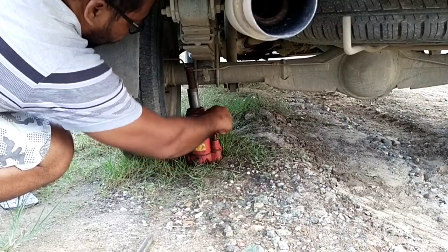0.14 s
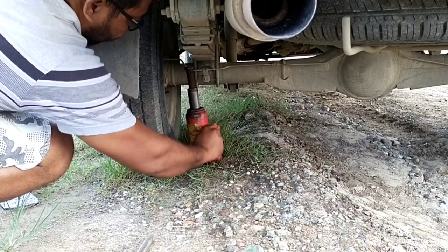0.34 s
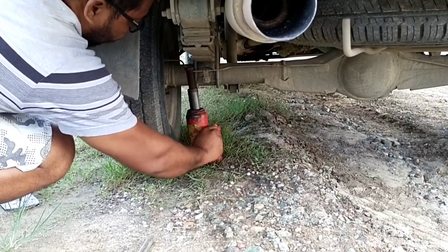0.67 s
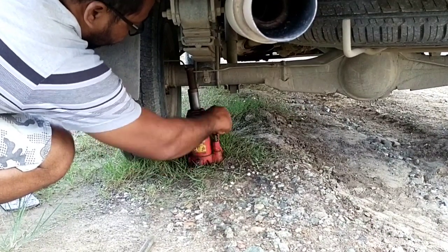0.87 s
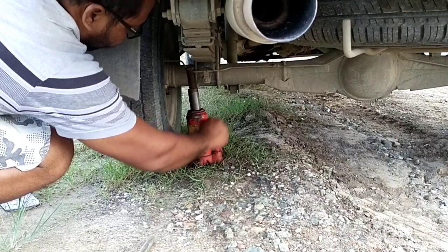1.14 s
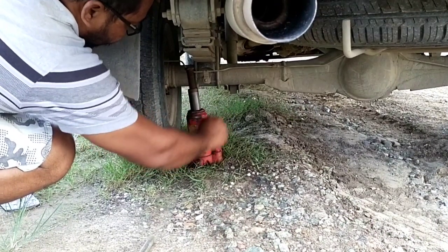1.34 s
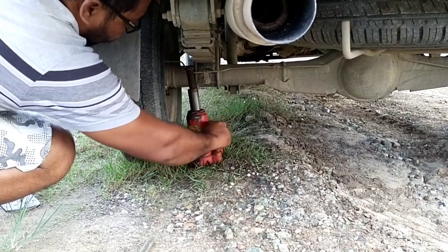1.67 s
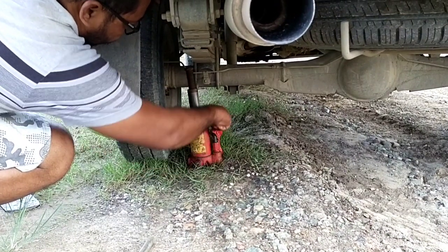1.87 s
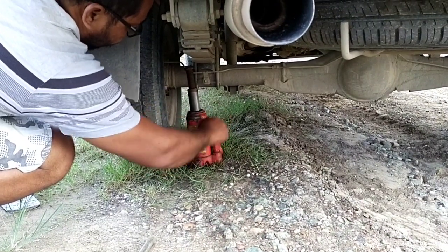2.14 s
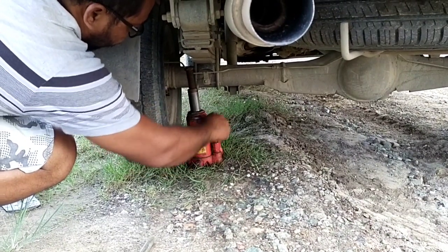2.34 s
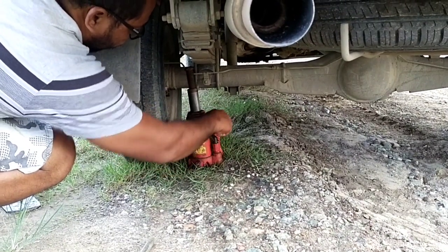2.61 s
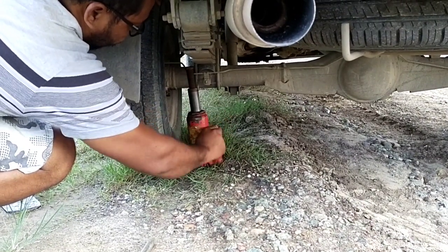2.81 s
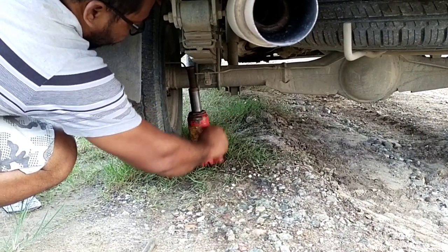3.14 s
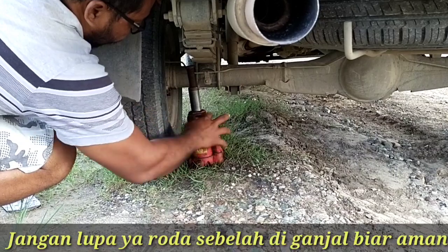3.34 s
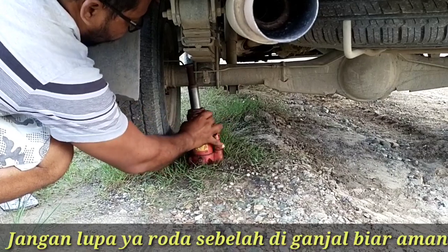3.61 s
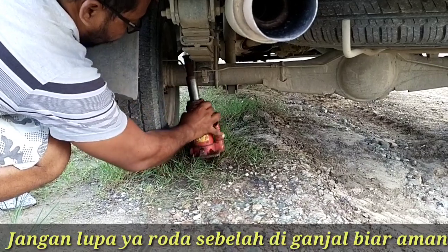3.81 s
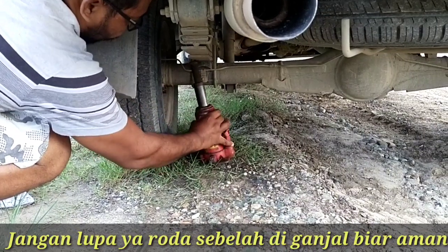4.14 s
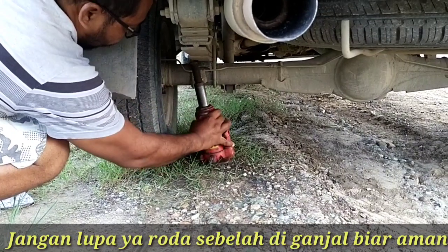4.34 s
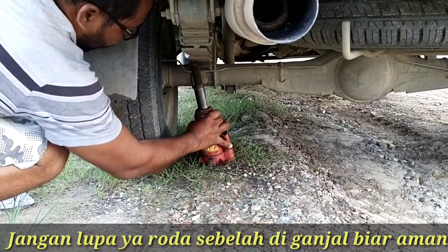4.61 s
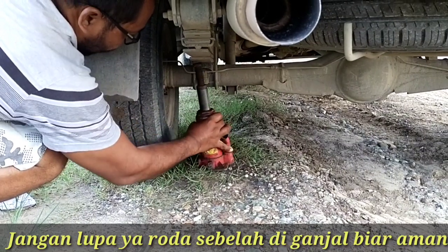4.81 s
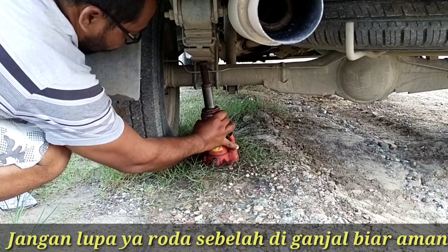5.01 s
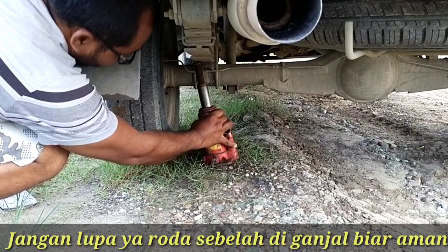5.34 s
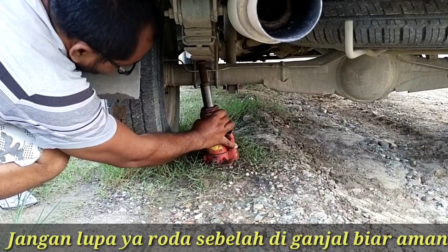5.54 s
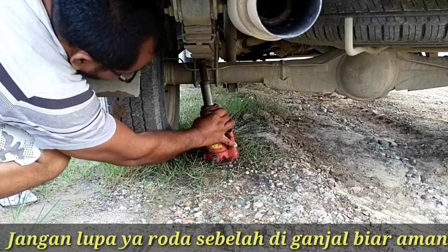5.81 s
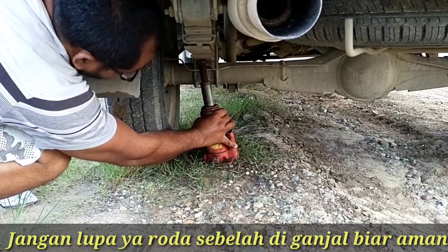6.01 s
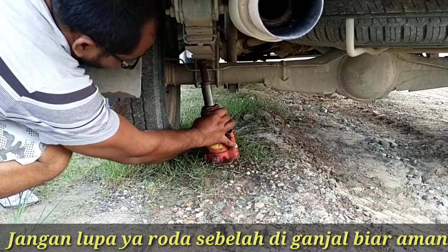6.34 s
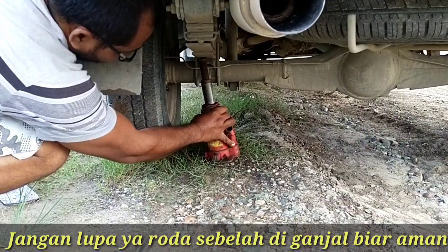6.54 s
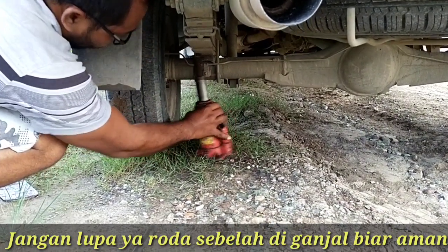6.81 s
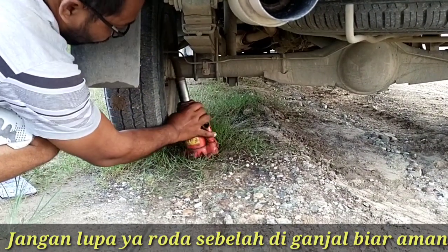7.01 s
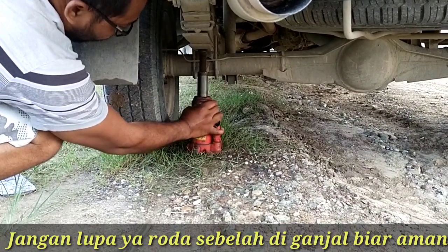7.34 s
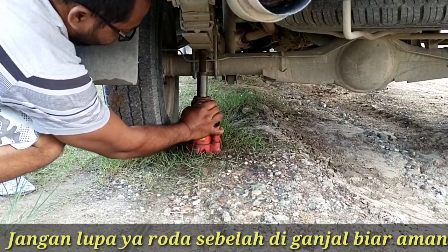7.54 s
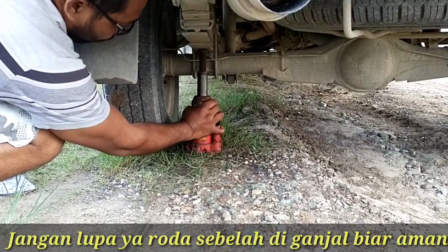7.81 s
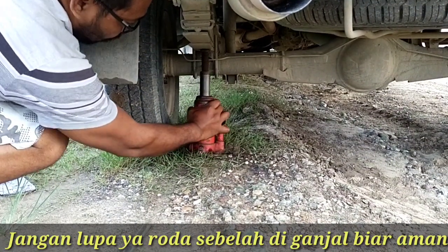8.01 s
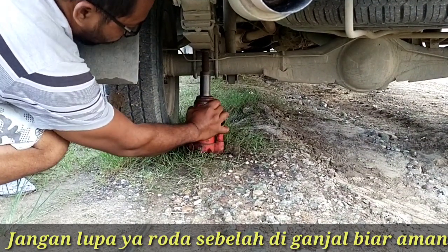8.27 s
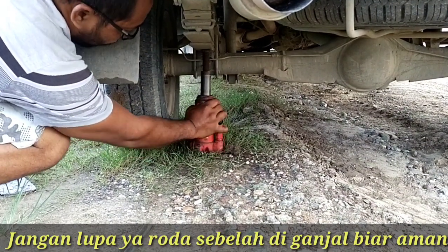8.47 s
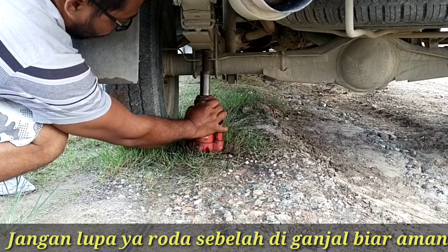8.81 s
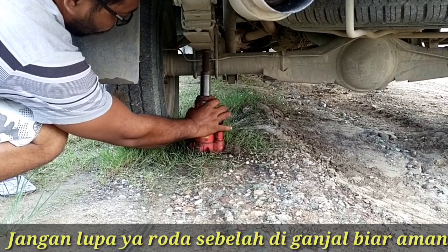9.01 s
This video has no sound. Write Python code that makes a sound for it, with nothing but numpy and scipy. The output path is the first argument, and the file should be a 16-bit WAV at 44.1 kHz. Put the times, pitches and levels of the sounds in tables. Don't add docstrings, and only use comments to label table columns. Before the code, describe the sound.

A hand-pumped steel jack clacks and rattles quickly, then shifts with ringing knocks and gravel scrapes, while a motorbike thumps low in the distance.

```python
import sys
import numpy as np
from scipy import signal
from scipy.fft import rfft, irfft, next_fast_len
from scipy.io import wavfile
from scipy.ndimage import uniform_filter1d, map_coordinates

SR = 44100
rng = np.random.default_rng(int(sys.argv[2]) if len(sys.argv) > 2 else 0)


def output_pcm(signal):
    pcm = np.clip(np.atleast_2d(signal).T, -1, 1) * 32767
    wavfile.write(sys.argv[1], SR, np.round(pcm).astype(np.int16))


def invert_db(x):
    u = np.asarray(x, float) / 20
    return 10 ** u


N = 403515

# (frequency [Hz], width [Hz], level [dB])
LINK_MODES = [(1170, 120, -9), (2410, 150, 3), (2760, 90, -6), (3330, 49, -5.5), (4020, 54, -10),
              (5400, 120, -8), (6030, 200, -4), (6626, 44, -6.5), (7800, 200, -13), (9240, 48, -11.5),
              (10870, 40, -9), (12150, 28, -13.5), (12860, 29, -15), (13400, 51, -19.5)]
# (frequency [Hz], width [Hz], level [dB])
AXLE_MODES = [(114.4, 28.7, 2), (245, 41, 6.5), (366, 64, -3), (587, 57, 2), (856, 27, -3.5), (989, 38, -2),
              (1161, 54, -7.5), (1300, 80, -3), (1475, 110, -8.5), (1664, 74, -4.5), (2053, 16, -15.5),
              (2810, 52, -3.5), (3070, 13, -10.5), (3965, 53, -7), (4430, 140, -18), (5890, 49, -17.5),
              (8500, 430, -26)]
# (time [s], level [dB], throttle bark over the thump [dB])
BIKE_LEVELS = [(0, -46, -22.5), (.8, -45, -44), (1.45, -49, -25.5), (1.75, -55.5, -29.5), (2.1, -67, -20),
               (2.75, -74.5, -20), (3.12, -57.5, -21), (3.32, -67.5, -28), (3.85, -49, -7), (4.02, -63, -3),
               (4.2, -49, -7.5), (4.72, -43.5, -8.5), (4.92, -57, -4), (5.3, -46.5, -12.5),
               (6.0, -38.5, -14), (6.8, -35.5, -18.5), (7.2, -37, -12.5), (9.15, -36, -6.5)]


def unit(x):
    return x / np.sqrt(np.mean(x ** 2) + 1e-20)


def along(points, hz):
    f, v = np.transpose(points)
    return np.interp(np.log(hz + 1), np.log(f + 1), v)


def curves(rows):
    s, *cols = np.transpose(rows)
    return [np.interp(np.arange(N) / SR, s, c) for c in cols]


def strokes(rows, sharp):
    t, gain = np.arange(N) / SR, np.zeros(N)
    for start, top, end, db in rows:
        phase = np.interp(t, [start, top, end], [0, np.pi / 2, np.pi])
        gain += invert_db(db) * np.sin(phase) ** sharp * (t < end)
    return gain


def wobble(rate_hz):
    at = np.arange(0, N + 32, 32)
    knots = rng.standard_normal(int(N * rate_hz / SR) + 4)
    return np.interp(np.arange(N), at, map_coordinates(knots, [at * rate_hz / SR]))


def filtered(x, response):
    m = next_fast_len(N + SR // 2)
    return irfft(rfft(x, m) * response(np.fft.rfftfreq(m, 1 / SR)), m)[..., :N]


def peak(f, hz, width_hz):
    return 1j * f * width_hz / (hz * hz - f * f + 1j * f * width_hz)


def body(modes, broad_db, lo_hz=0, hi_hz=102400.0, gain_db=0):
    def response(bins):
        f = bins[::8]
        edges = 1 / np.sqrt((1 + (lo_hz / (f + 1)) ** 6) * (1 + (f / hi_hz) ** 6))
        skirt = invert_db(broad_db + along([(hz, db) for hz, _, db in modes], f))
        ringing = sum((-1) ** k * invert_db(db) * peak(f, hz, w) for k, (hz, w, db) in enumerate(modes))
        h = edges * (skirt + ringing)
        return np.interp(bins, f, invert_db(gain_db) * h / np.sqrt(np.mean(np.abs(h) ** 2)))
    return response


def gritty(per_s, spread_db):
    hits = rng.random(N) < per_s / SR
    return unit(hits * rng.standard_normal(N) * invert_db(spread_db * rng.exponential(1, N)))


def blows(events, bands, snap, tail_db, tail_stretch, spot=.5, strike=0, cancel=0):
    t, out = np.arange(SR // 3) / SR, np.zeros(N)
    for k, (response, t60_factor, rise_s) in enumerate(bands):
        push = np.zeros(N + SR)
        grain = rng.standard_normal(N + SR) * np.resize(invert_db(2.24 * wobble(400)), N + SR)
        impulse = strike * np.exp(-rise_s / 0.0026)
        for s, db, *more in events:
            level = invert_db(db + ([0] + more[:-1])[k])
            t60_s = more[len(bands) - 1] * t60_factor
            at, hit = round(s * SR), round((s + rise_s) * SR)
            fade = invert_db(-60 * t / t60_s) + snap * invert_db(-60 * t / 0.0051)
            fade += invert_db(tail_db - 60 * t / (t60_s * tail_stretch))
            burst = grain[at:][:len(t)]
            if k == 0 and len(more) > len(bands):
                burst = unit(signal.lfilter(*signal.iirpeak(more[-1], 1 / spot, SR), burst))
            lag = 3 + int(abs(burst[0]) * 40) % 17
            burst = burst + cancel * np.roll(burst, lag)
            push[at:][:len(t)] += level * fade * (1 - np.exp(-t / rise_s)) * burst
            push[hit] += level * impulse
            push[hit + lag] += level * cancel * impulse
        out += filtered(push[:N], response)
    return out


def linkage():
    # (time [s], peak [dB], clang [dB], sizzle [dB])
    lifts = [(0.0265, -39, -6, -3.5), (0.0719, -33, -11, -11.5), (.382, -36.5, -12, -0.5),
             (0.4095, -30.5, -13, -7), (0.4289, -33, -15, -3), (0.7548, -39, -1.5, 11), (1.09, -46, -11, 0),
             (1.1151, -32, -5, -1), (1.1447, -31, -11, -18.5), (1.513, -44, -4.5, 2),
             (1.728, -40, -23.5, -14), (2.1106, -40.5, -13, -8), (2.504, -43.5, -2, 6),
             (2.537, -37, -17, 2), (2.868, -39, -33, -8.5), (2.8892, -33.5, 0, 12),
             (2.9198, -29, -21, -12.5)]
    # (time [s], peak [dB], sizzle [dB])
    stops = [
        (0.0893, -13, -9),
        (0.4438, -18.5, -19.5),
        (0.7888, -29.5, -6.5),
        (1.1612, -9.5, 1),
        (1.572, -38.5, -14),
        (1.805, -17, -14),
        (2.1976, -17.5, -9.5),
        (2.587, -19, -32),
        (2.9372, -13.5, -5),
    ]
    # (time [s], peak [dB], clang [dB], sizzle [dB])
    rattles = [(.142, -33, -3, -1.5), (.192, -25, -26, -2), (0.236, -46, -3, 0), (0.5012, -38.5, -10, 2),
               (0.5594, -36, -17, 2.5), (.585, -45.5, -19, 3.5), (0.846, -25, -9, -20),
               (.931, -33, -20, -4), (1.2532, -44.5, -3.5, -0.5), (1.305, -52, -10, 2.5),
               (1.861, -36, -11, 5.5), (1.9452, -40, -35, 2), (2.2465, -41, -4, 0),
               (2.277, -49.5, -17, -15), (2.3314, -41, -30, -28), (2.352, -55, -20, -24),
               (2.3845, -46, -31, -35), (2.437, -57, -14, -30), (2.6296, -39.5, -8, 0),
               (2.7271, -34, -27, -14), (3.009, -44.5, 2, -1), (3.072, -52.5, -15, -5),
               (3.338, -49, -1.5, -8)]
    # (time [s], peak [dB], clang [dB], sizzle [dB])
    jangles = [(3.686, -43.5, -19, 11.5), (3.7242, -23.5, -4, -8), (3.747, -29, 1, 9),
               (3.7667, -27.5, -21, -10.5), (4.558, -56.5, -25, 7.5), (5, -58, -15, 1),
               (6.5699, -57.5, -11, 11), (6.6487, -39, -1.5, 8), (7.7875, -47.5, -16.5, -1),
               (8.2003, -55, 6, -8), (8.2995, -46, -8, -12), (7.755, -56, -20, -6), (4.573, -59.5, -12, 9),
               (8.5146, -56, -24, -5.5)]
    loose_t60_s, halves_db, longest_s = 0.053, 10.5, 0.093
    stop_clang_db, stop_t60_s, jangle_t60_s = -11.5, 0.044, 0.064
    contacts = [(*row, jangle_t60_s) for row in jangles]
    for row in lifts + rattles:
        contacts.append((*row, min(longest_s, loose_t60_s * 2 ** (-(row[1] + 32) / halves_db))))
    for s, db, sizzle_db in stops:
        contacts.append((s, db, stop_clang_db, sizzle_db, stop_t60_s))
    skirt_db = -7
    bands = [(body(LINK_MODES, skirt_db, 1800, 4300), 1.01, .001),
             (body(LINK_MODES, skirt_db, 900, 1800), 1.1, .001),
             (body(LINK_MODES, skirt_db, 4500), .8, .0006)]
    return invert_db(-9) * blows(contacts, bands, snap=3.2, tail_db=-22.5, tail_stretch=5, strike=9, cancel=.35)


def plunger():
    # (start [s], end [s], level [dB])
    slides = [
        (0.013, 0.291, -51),
        (0.362, 0.58, -52.5),
        (0.712, 0.97, -54),
        (1.079, 1.316, -53),
        (1.695, 1.999, -57),
        (2.087, 2.303, -56),
        (2.49, 2.73, -66.5),
        (2.857, 3.028, -53.5),
    ]
    top = 0.35
    swells = [(start, start + top * (end - start), end, db) for start, end, db in slides]
    grains = gritty(1500, spread_db=3) * invert_db(5 * wobble(45))
    return strokes(swells, sharp=0.79) * unit(filtered(grains, body(LINK_MODES, -11, 1000, 12000)))


def base_rocking():
    # (time [s], peak [dB], t60 [s])
    rocks = [
        (0.251, -51, 0.093),
        (1.709, -52.5, 0.18),
        (1.974, -43, 0.026),
        (2.117, -45, 0.057),
        (2.374, -43, 0.079),
        (2.52, -45, 0.1),
        (2.726, -39, 0.025),
    ]
    bands = [(body(AXLE_MODES, -4, 210, 940), 1.01, .0031)]
    return invert_db(-6.5) * blows(rocks, bands, snap=1.0, tail_db=-14.5, tail_stretch=3.5)


def release_key():
    # (time [s], peak [dB])
    ticks = [
        (5.288, -44.5),
        (5.3005, -40.5),
    ]
    bands = [(lambda f: 3 * peak(f, 3100, 1100) ** 2, 1.01, .0007)]
    return blows([(*row, .03) for row in ticks], bands, snap=1.29, tail_db=-24.0, tail_stretch=3.4)


def axle_knocks():
    # (time [s], peak [dB], thud [dB], crack [dB], t60 [s])
    hits = [(3.453, -43.5, -1, -4, 0.22), (3.481, -45.5, 2, -9, 0.091), (3.511, -59.5, 3, -6, 0.1),
            (3.710, -40.5, 7.5, 5, 0.33), (3.789, -46, 6.5, -7, 0.087), (4.112, -31, -4, -10, 0.25),
            (4.486, -53, 10, -22, 0.12), (4.639, -24.5, -8, -12, 0.22), (4.44, -52, -6, -15, 0.095),
            (6.632, -40, -6, -16, 0.21), (6.902, -57, -9, -12, .3), (6.931, -11.5, -26.5, -10, 0.13),
            (6.947, -32, -2, -17, 0.34), (7.697, -38, 4.5, -3.5, 0.22), (8.226, -33, -14, -14, 0.19),
            (8.243, -35, 8, -6, .42)]
    ring_hz, octave_db = 836, 20.5
    events = [(*row, ring_hz * 2 ** (-row[2] / octave_db)) for row in hits]
    skirt_db = -9
    bands = [(body(AXLE_MODES, skirt_db, 500, 1900), 1.01, .0003),
             (body(AXLE_MODES, skirt_db, 180, 302, gain_db=17.5), 1.3, .009),
             (body(AXLE_MODES, skirt_db, 2000, 6000, gain_db=15), .3, .0005)]
    return invert_db(-19.0) * blows(events, bands, snap=2.1, tail_db=-27.5, tail_stretch=3.15, spot=0.48, strike=10.6)


def clear_rings():
    # (time [s], frequency [Hz], peak [dB], t60 [s])
    ringing = [(2.332, 2420, -46, .05), (2.352, 2400, -54, .05), (2.385, 2450, -48, .05),
               (2.439, 2400, -54, .06), (3.456, 378, -49.5, 0.26), (3.687, 6600, -44, .1),
               (3.722, 2850, -26, .09), (3.724, 609, -38, .15), (3.775, 490, -42, .25),
               (3.012, 1170, -56, .1), (3.747, 898, -33, .05), (3.767, 3290, -30, .05),
               (4.113, 1000, -40, .12), (4.113, 840, -46, .25), (4.113, 1430, -46, .1),
               (4.49, 620, -52, .05), (4.639, 1000, -40, .12), (4.639, 1430, -44, .1),
               (4.639, 3900, -46, .03), (4.65, 320, -44, .3), (5.301, 2847, -54, .1),
               (5.598, 900, -54, .03), (6.932, 600, -39.5, .2), (6.932, 2850, -42, .1),
               (6.932, 1650, -39, .08), (6.935, 1310, -40, .15), (6.947, 1425, -39.5, 0.21),
               (6.96, 400, -44, .5), (6.97, 1290, -56, .7), (7.7, 245, -38, .25), (7.7, 1676, -49, .06),
               (7.7, 2850, -58, .08), (8.228, 1340, -48, .15), (8.242, 2830, -52, .12),
               (8.25, 245, -29, .3), (8.3, 280, -40, .3), (8.26, 520, -50, .5), (8.298, 2230, -55, .1),
               (8.298, 3950, -56, .06), (8.45, 3900, -64, .03), (8.513, 3900, -60, .03),
               (9.088, 3750, -62, .02)]
    t, out = np.arange(SR // 2) / SR, np.zeros(N + SR)
    for s, hz, db, t60_s in ringing:
        swell = 1 - np.exp(-t * hz / 1.1)
        out[round(s * SR):][:len(t)] += invert_db(db - 60 * t / t60_s) * swell * np.sin(2 * np.pi * hz * t)
    return out[:N]


def scrape():
    # (start [s], loudest [s], end [s], level [dB])
    drags = [
        (3.705, 3.755, 3.8, -41),
        (4.27, 4.42, 4.57, -57.5),
        (4.62, 4.69, 4.8, -52),
        (6.5, 6.62, 6.76, -54.5),
        (7.62, 7.74, 7.9, -60),
        (8.22, 8.26, 8.33, -63),
        (5.3, 5.33, 5.42, -68),
        (6.08, 6.14, 6.23, -63.5),
    ]
    # (frequency [Hz], density [dB per Hz])
    grit = [(410, -58), (700, -8.5), (1200, -6.5), (1450, -4.5), (2160, -6), (3350, -4.5), (8870, -15.5),
            (15000, -34)]
    grains = gritty(6000, spread_db=-2.0) * invert_db(1.7 * wobble(50))
    return strokes(drags, sharp=1.67) * unit(filtered(grains, lambda f: invert_db(along(grit, f))))


def crunch():
    # (start [s], loudest [s], end [s], level [dB])
    crunches = [
        (3.705, 3.745, 3.84, -44),
        (4.3, 4.4, 4.5, -57),
        (4.64, 4.69, 4.78, -54),
        (6.5, 6.56, 6.7, -62),
        (7.66, 7.7, 7.76, -64),
    ]
    grains = gritty(4000, spread_db=1.5) * invert_db(2.5 * wobble(90))
    return strokes(crunches, sharp=1.2) * unit(filtered(grains, lambda f: peak(f, 2700, 3200) ** 2))


def saddle_creak():
    # (start [s], loudest [s], end [s], level [dB])
    creaks = [
        (4.97, 5.03, 5.14, -51),
        (5.15, 5.19, 5.24, -69),
        (5.29, 5.33, 5.4, -66),
    ]
    # (frequency [Hz], width [Hz], level [dB])
    saddle = [(295, 35, 7), (600, 37, 10), (786, 30, 6), (1110, 45, -4), (1614, 33, -10), (2890, 130, -8),
              (4020, 420, -15.5)]
    slip_count = np.floor(np.cumsum(95 * (1 + 0.2 * wobble(60))) / SR)
    slips = np.diff(slip_count, prepend=0) * invert_db(2.5 * wobble(90))
    rub = slips + .06 * rng.standard_normal(N)
    return strokes(creaks, sharp=.8) * unit(filtered(rub, body(saddle, -30, 220, 4500)))


def seal_squeak():
    # (start [s], loudest [s], end [s], level [dB])
    squeaks = [
        (5.608, 5.65, 5.708, -58),
    ]
    tone = np.sin(2 * np.pi * np.cumsum(660 + 8 * wobble(45)) / SR)
    return strokes(squeaks, sharp=0.34) * invert_db(2.5 * wobble(70)) * tone


def ports(x):
    # (frequency [Hz], lead [rad])
    lead = [(20, 0.4), (300, -0.42), (700, -0.06), (1400, -1.57), (2700, -1), (5000, -1.54), (9000, -1.1),
            (15000, -2)]
    # (frequency [Hz], level [dB])
    tilt = [(60, 2), (300, 1.2), (900, -0.8), (2400, 2), (5000, 6.5), (15000, 7.5)]

    def both(f):
        half = invert_db(along(tilt, f) / 2) * np.exp(.5j * along(lead, f))
        return np.array([half, 1 / half])
    return filtered(x, both)


def underbody(x):
    t = np.arange(SR // 8) / SR
    tail = rng.standard_normal((2, len(t))) * invert_db(-60 * t / 0.075)
    tail = signal.sosfilt(signal.butter(2, 600, "high", fs=SR, output="sos"), tail)
    return signal.fftconvolve(x[None], tail / np.linalg.norm(tail[0]), axes=1)[:, :N]


def motorbike():
    # (time [s], firing rate [Hz])
    firing = [(0, 30.6), (1.05, 26.5), (2.1, 21.9), (2.8, 19.5), (3.15, 21.8), (4.9, 20.1), (5.6, 20.7),
              (5.95, 22), (6.65, 22.6), (7.0, 23.7), (7.7, 24.4), (8.05, 24.7), (9.15, 24.8)]
    # (time [s], phase wander [rad])
    hidden = [(0, 0.33), (1.7, 0.67), (2.2, 1.3), (5.2, 1.28), (5.8, 0.58), (9.15, .2)]
    # (frequency [Hz], level [dB])
    pipe = [(45, -33.5), (75, -21.5), (98, 0.5), (122, 4.5), (148, -9), (175, -16.5), (200, -1),
            (230, -0.5), (250, 1.5), (280, -17), (330, -26.5)]
    brightens, even_db = 0.81, -15.5
    rate_hz, wander = curves(firing)[0], curves(hidden)[0]
    thump_db, bark_db = curves(BIKE_LEVELS)
    turns = np.cumsum(rate_hz) / SR + .3 + 0.008 * wobble(17)
    out = np.zeros(N)
    for k in range(3, 13):
        hz = k * rate_hz
        barks = 1 / (1 + (185 / hz) ** 20)
        db = along(pipe, hz) - 3 + thump_db + barks * bark_db
        db += (1 - barks) * brightens * (bark_db - even_db) * np.log2(hz / 110)
        db += 1.1 * wobble(4) + 2.5 * wander * wobble(15)
        out += invert_db(db) * np.sin(2 * np.pi * k * turns + 0.203 * k * k + wander * wobble(14))
    return out


def near_frogs():
    # (time [s], peak [dB], throat [Hz], length [s])
    calls = [(1.397, -55, 3050, .075), (1.547, -53.5, 2960, 0.051), (2.04, -53, 2970, 0.047),
             (2.688, -51.5, 3080, .04), (2.801, -50.5, 3050, .045), (3.086, -49, 3250, 0.055),
             (3.23, -53.5, 3250, 0.028), (3.264, -51, 3250, 0.03), (3.368, -52, 3150, 0.03),
             (3.413, -58, 3550, .02), (3.431, -52, 3400, .04), (3.504, -52.5, 3050, 0.037),
             (3.572, -59, 3500, 0.027), (3.603, -50.5, 3450, 0.027), (3.65, -53, 3200, .036),
             (3.99, -55, 3140, 0.044), (7.094, -53.5, 3000, .042), (7.226, -54.5, 3030, 0.04),
             (7.361, -55.5, 3030, .042), (7.499, -55.5, 3060, .042), (7.635, -55.5, 3150, .042),
             (7.79, -53, 3100, .042), (7.893, -62, 3000, 0.028)]
    clicks_per_s, throat_q, echo_db, echo_t60_s = 330, 3.6, -11, .16
    t, out = np.arange(SR // 6) / SR, np.zeros(N + SR)
    click_count = np.floor(np.cumsum(clicks_per_s * (1 + .25 * wobble(150))) / SR)
    clicks = np.diff(click_count, prepend=0) * invert_db(2.8 * rng.standard_normal(N))
    clicks = np.resize(unit(clicks) + .35 * rng.standard_normal(N), N + SR)
    blur = rng.standard_normal(N + SR)
    for s, db, hz, length_s in calls:
        at = round(s * SR)
        throat = signal.butter(2, [hz * (1 - .5 / throat_q), hz * (1 + .5 / throat_q)], "band", fs=SR)
        swell = np.sin(np.pi * np.clip(t / length_s, 0, 1) ** .7) ** .6 * (t < length_s)
        call = swell * clicks[at:][:len(t)]
        call += invert_db(echo_db - 60 * np.abs(t - length_s) / echo_t60_s) * blur[at:][:len(t)]
        call = signal.lfilter(*throat, signal.lfilter(*throat, call))
        out[at:][:len(t)] += invert_db(db - 5) * call * np.sqrt(throat_q * SR / hz / 4)
    return out[:N] * invert_db([[1.5], [-1.5]])


def far_frogs():
    # (start [s], loudest [s], end [s], level [dB])
    croaks = [
        (4.76, 4.8, 4.845, -65),
        (4.855, 4.885, 4.91, -66),
        (5.01, 5.045, 5.08, -66),
        (5.162, 5.185, 5.225, -65),
        (5.315, 5.335, 5.375, -63),
        (5.465, 5.49, 5.535, -66),
        (5.635, 5.655, 5.71, -75),
        (5.775, 5.795, 5.84, -73),
        (5.925, 5.95, 5.99, -73),
        (6.26, 6.285, 6.33, -71),
    ]
    # (frequency [Hz], width [Hz], level [dB])
    sac = [(1155, 70, 1), (2110, 80, -14), (2670, 90, -7), (3170, 130, -1), (3890, 80, -6), (4360, 50, -9)]
    # (start [s], loudest [s], end [s], level [dB])
    answers = [
        (4.915, 4.945, 4.975, -71),
        (5.075, 5.1, 5.125, -69),
        (5.23, 5.26, 5.29, -70),
        (5.38, 5.4, 5.44, -69),
    ]
    pair = rng.standard_normal((2, N)) * 0.67 + rng.standard_normal(N)
    croak = unit(filtered(pair, lambda f: sum(invert_db(db) * peak(f, hz, w) ** 2 for hz, w, db in sac)))
    answer = unit(filtered(pair[:, ::-1], lambda f: peak(f, 3250, 230) ** 2))
    return strokes(croaks, sharp=.7) * croak + strokes(answers, sharp=.7) * answer


def rush(spectrum, patchy_db):
    # (frequency [Hz], left-right likeness [-1..1])
    likeness = [(60, 1), (240, 0.71), (950, 0.1), (3770, 0.11), (15000, 0.1)]
    z = signal.stft(rng.standard_normal((2, N)), nperseg=512)[2]
    field = uniform_filter1d(uniform_filter1d(rng.standard_normal(z.shape[1:]), 5, 0), 8, 1)
    pair = signal.istft(z * invert_db(patchy_db * unit(field)), nperseg=512)[1][:, :N]

    def mid_side(f):
        turn = np.arccos(np.clip(along(likeness, f), -1, 1)) / 2
        return spectrum(f) * [np.cos(turn), np.sin(turn)]
    mid, side = filtered(pair, mid_side)
    return unit(np.array([mid + side, mid - side]))


def cicadas():
    # (time [s], level [dB])
    chorus = [(0, -66), (2, -75.5), (3.4, -72.5), (5, -72), (7, -68.5), (9.15, -72.5)]
    beat = np.cos(2 * np.pi * np.cumsum(9.6 + .5 * wobble(1.8)) / SR)
    band = rush(lambda f: 1 / (1 + ((f - 7230) / 270) ** 4), patchy_db=2.5)
    return invert_db(curves(chorus)[0] + 3 * beat) * band


def far_insects():
    # (start [s], loudest [s], end [s], level [dB])
    drones = [
        (7.3, 7.42, 7.6, -76),
        (8.0, 8.45, 8.75, -76),
    ]

    def far(hz, width_hz):
        return unit(filtered(rng.standard_normal((2, N)), lambda f: peak(f, hz, width_hz) ** 2))
    s = np.arange(N) / SR
    bouts = (s > 8.3) | (abs(s - 6.05) < .5)
    chirps = invert_db(-94 + 17 * np.cos(2 * np.pi * 3.94 * (s - 5.67))) * bouts
    return chirps * far(5260, 700) + strokes(drones, sharp=0.37) * (far(4060, 300) + far(2250, 250))


def road_rumble():
    # (frequency [Hz], density [dB per Hz])
    low = [(15, -46.5), (30, -20.5), (60, -17.5), (100, 4), (150, -6.5), (250, -16.5), (400, -29),
           (700, -42), (1300, -74.5)]
    road_db, follows = -55.5, 0.49
    db = road_db + follows * (curves(BIKE_LEVELS)[0] + 46) + 1.1 * wobble(3)
    return invert_db(db) * rush(lambda f: invert_db(along(low, f)), patchy_db=1.5)


def open_air():
    # (frequency [Hz], density [dB per Hz])
    hiss = [(180, -33), (300, -14.5), (326, -17), (494, -20.5), (915, -28), (2520, -28), (5200, -38.5),
            (7200, -36.5), (8090, -37), (8940, -30), (10600, -42), (14700, -43.5), (16000, -63.5)]
    # (time [s], level [dB])
    hiss_levels = [(0.0, -69), (9.15, -69)]
    return invert_db(curves(hiss_levels)[0] - 0.5) * rush(lambda f: invert_db(along(hiss, f)), patchy_db=3.5)


def scene():
    pumping = linkage() + plunger() + base_rocking() + release_key()
    sliding = axle_knocks() + clear_rings() + scrape() + crunch() + saddle_creak() + seal_squeak()
    jack = pumping + sliding
    near = ports(jack) + invert_db(-8) * underbody(jack)
    road = motorbike() * invert_db([[.3], [-.3]]) + road_rumble()
    animals = near_frogs() + far_frogs() + cicadas() + far_insects()
    return near + road + animals + open_air()


def band_limit(x):
    return signal.sosfilt(signal.butter(12, 16470, fs=SR, output="sos"), x)


def record(dry):
    mix = filtered(dry, lambda f: 1 / np.sqrt(1 + (f / 15200) ** 40))
    return band_limit(mix)


dry = scene()
out = record(dry)
output_pcm(out)
```